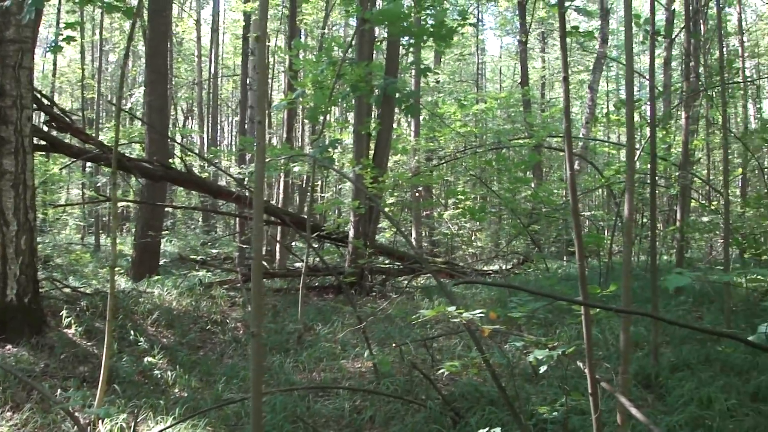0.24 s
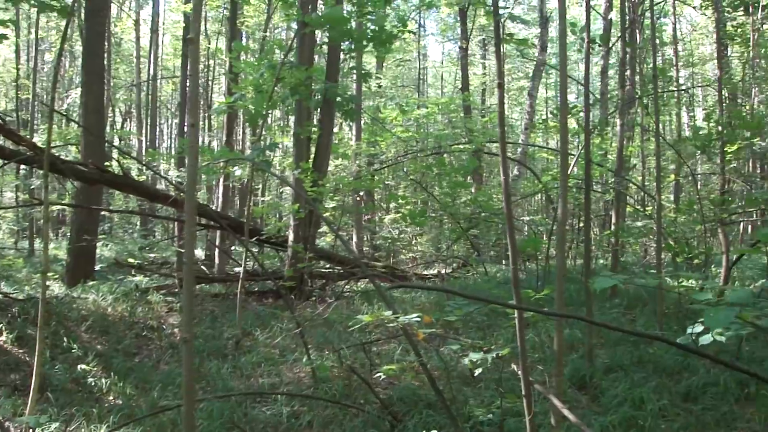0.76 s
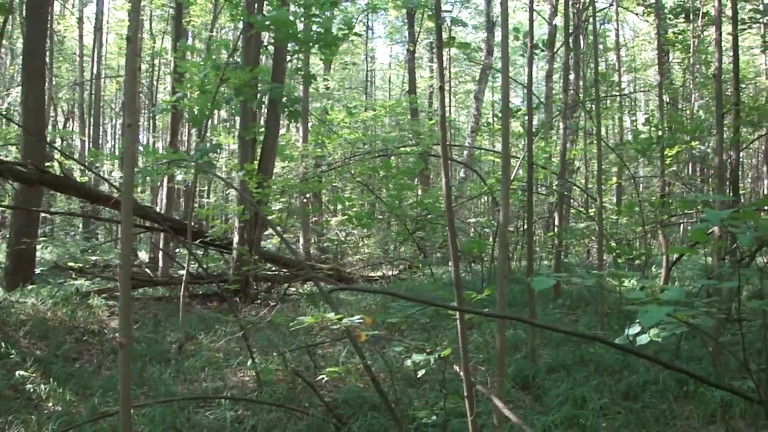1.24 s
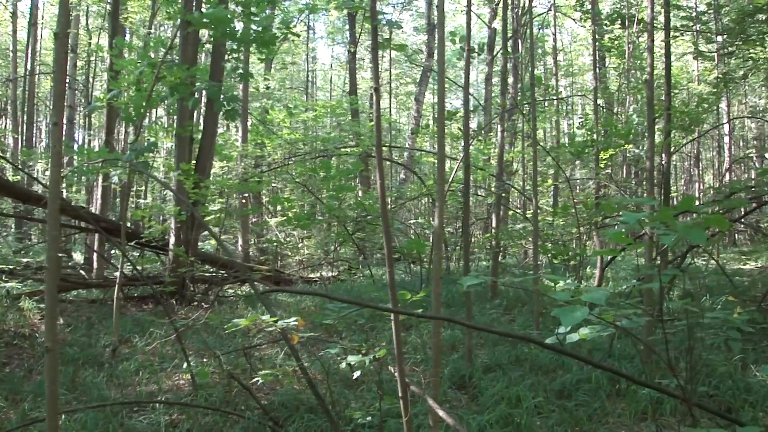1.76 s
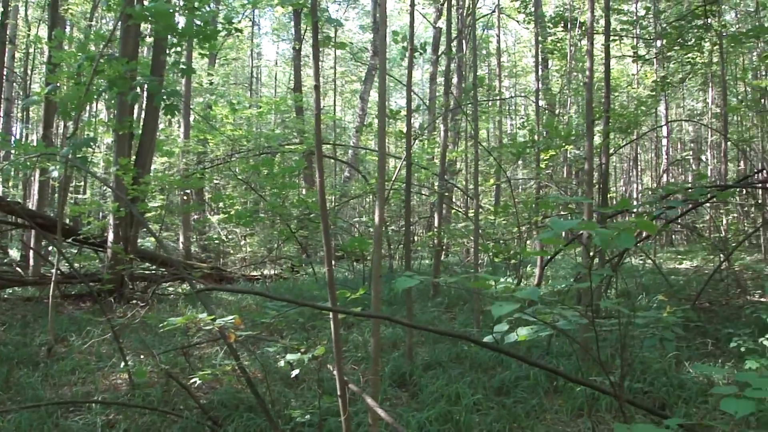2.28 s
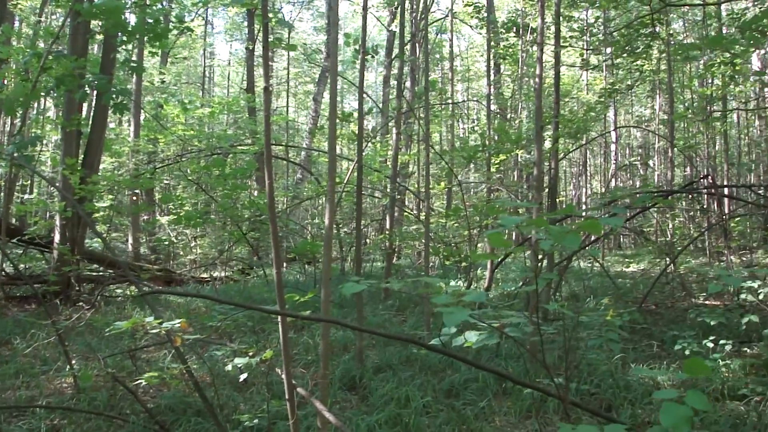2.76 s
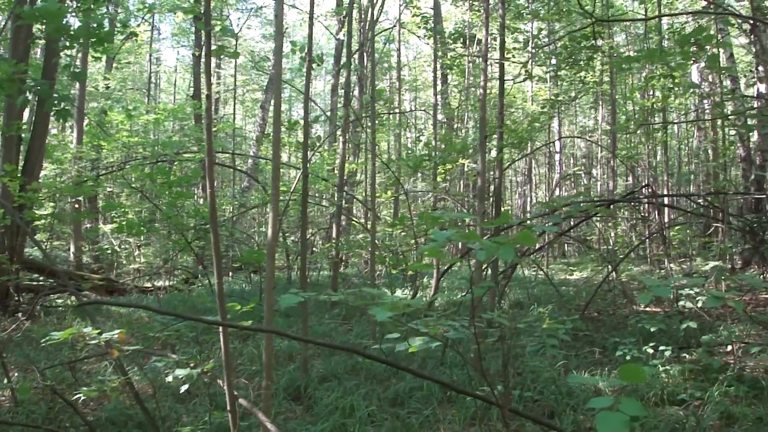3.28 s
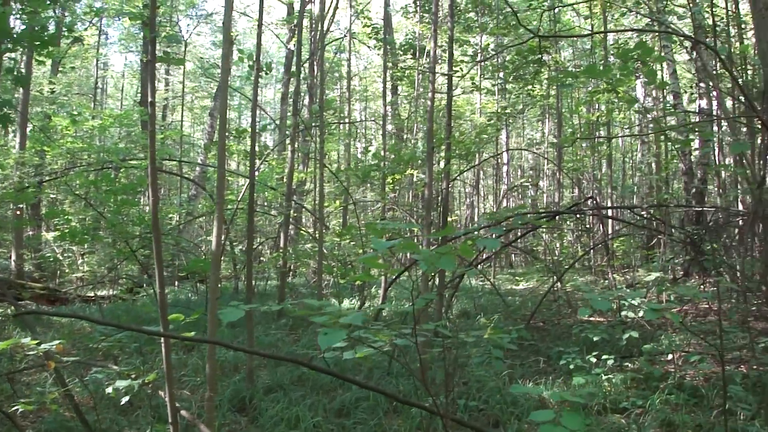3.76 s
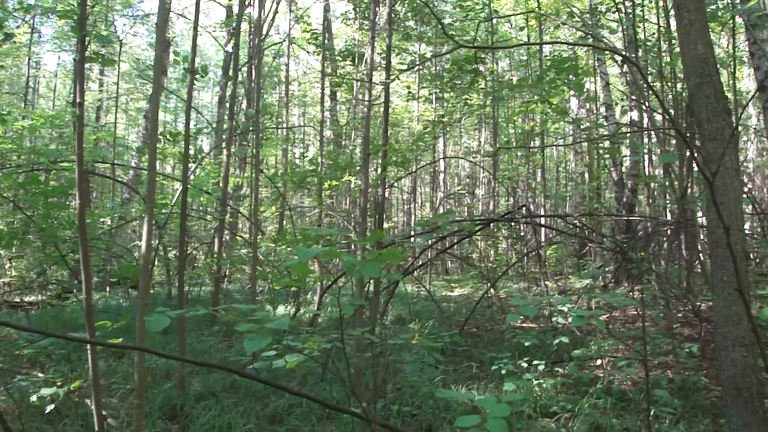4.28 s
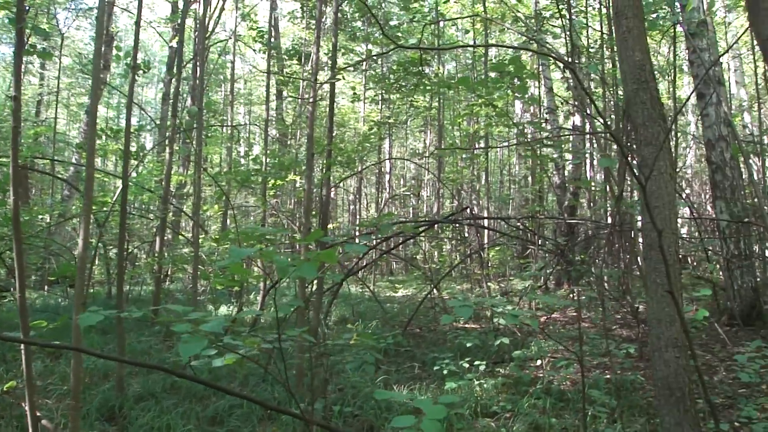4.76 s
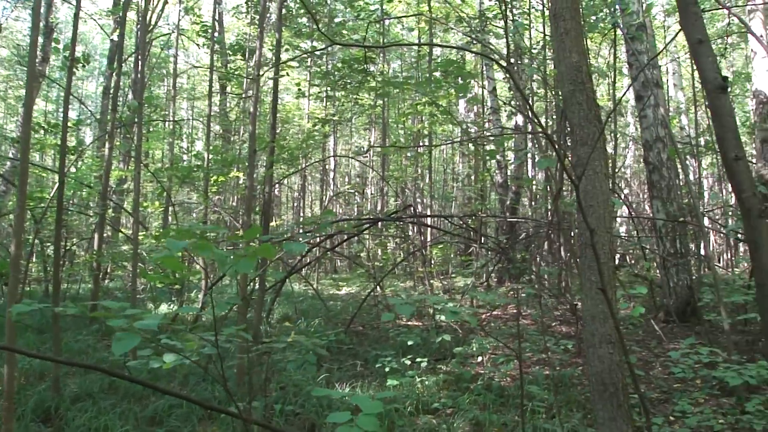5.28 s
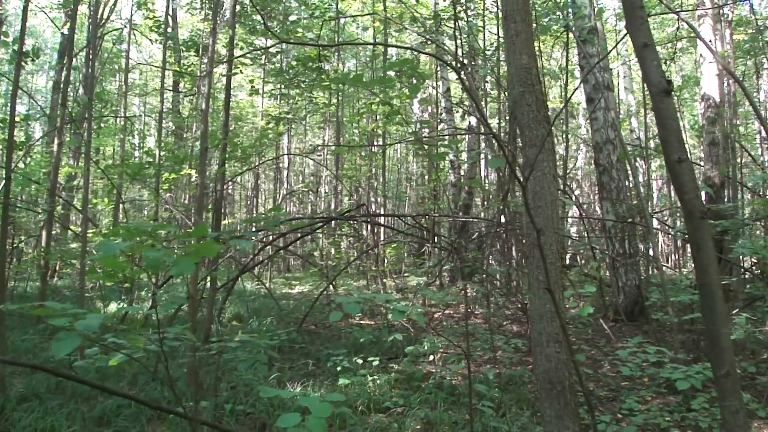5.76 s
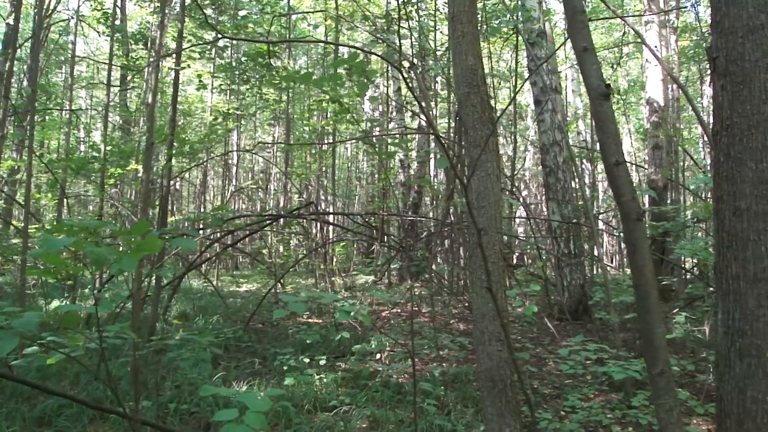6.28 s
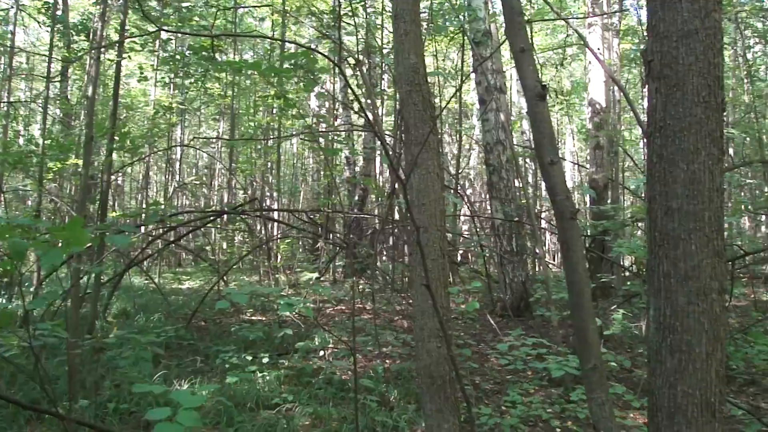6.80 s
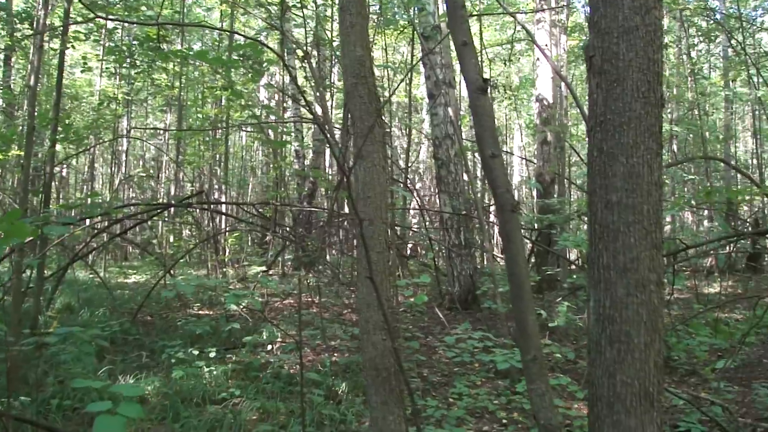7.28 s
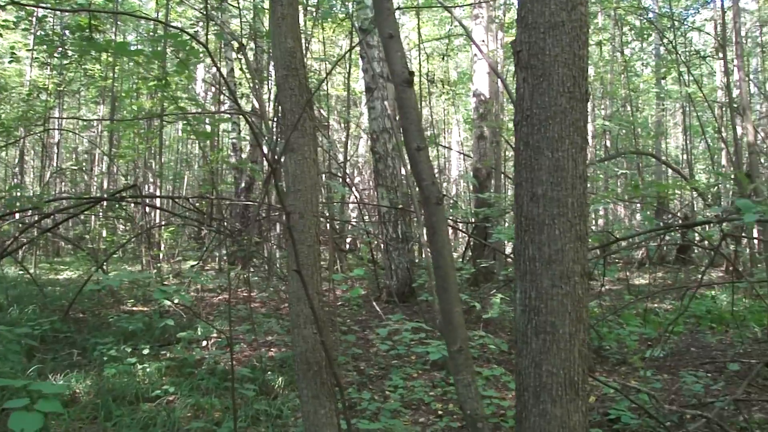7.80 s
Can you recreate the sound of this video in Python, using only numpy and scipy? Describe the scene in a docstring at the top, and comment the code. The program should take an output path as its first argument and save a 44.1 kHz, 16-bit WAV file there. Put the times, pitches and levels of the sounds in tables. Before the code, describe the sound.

Outdoors in a leafy summer forest, a breeze swells over the first few seconds and holds. Near leaves make a bright, even hiss, boughs add a softer swish, and distant treetops a faint low roar. The stereo hiss drifts further right as the microphone turns. Small wind bumps come early and midway; much louder, low, fluttering thumps crowd the last half second, harder on the right.

```python
"""A breeze rises in a summer forest: far crowns roar, boughs swish and leaves hiss overhead.
The foliage is coloured, patchy noise driven by one breeze curve. A camera turns slowly, so the treetop
hiss moves across its two microphone ports and leans further right. Eddies of air thump on the ports as
short swings of pressure in puffs of rumble, in opposite directions and harder on the right."""
import sys
import numpy as np
from scipy import signal
from scipy.fft import rfft, irfft, next_fast_len
from scipy.io import wavfile
from scipy.ndimage import uniform_filter1d, map_coordinates

SR = 44100
rng = np.random.default_rng(int(sys.argv[2]) if len(sys.argv) > 2 else 0)


def persist_wave(psi):
    """Save psi, clipped to +-1, as 16-bit WAV."""
    counts = np.round(np.clip(psi, -1, 1) * 32767).astype(np.int16)
    wavfile.write(sys.argv[1], SR, np.atleast_2d(counts).T)


N = 354519  # samples
TOP_HZ = 15460  # band limit of the camera
FRAME = 512  # samples in a spectral frame of the foliage
FULL_DB = -40  # leaf level that counts as full breeze

# the turn: each pair is a value at AHEAD_S and its change per second
AHEAD_S = 3
LEAD_US, LEAD_US_PER_S = -2.6, -3.5  # lead of the left port, before its growth with pitch
BALANCE_DB, BALANCE_DB_PER_S = -4.2, -0.6  # left minus right, before the soft limit and the share per pitch
BALANCE_MOST_DB = 7  # soft limit: the camera body shades a port by no more than this
TILT_DB, TILT_DB_PER_S = 1.06, -0.63  # hiss tilt per octave: duller as the ports turn away


def amp(db):
    """Decibels to a linear factor."""
    return 10 ** (np.asarray(db) / 20)


def unit(x):
    """x scaled to an RMS of one."""
    return x / np.sqrt(np.mean(np.abs(x) ** 2) + 1e-30)


def along(points, hz):
    """(Hz, value) points read on a log frequency axis."""
    f, v = np.transpose(points)
    return np.interp(np.log(hz + 1), np.log(f + 1), v)


def curves(rows, t):
    """The columns after the time, read at times t."""
    s, *cols = np.transpose(rows)
    return [np.interp(t, s, c) for c in cols]


def wobble(rate):
    """A smooth random curve, rate knots a second."""
    knots = rng.standard_normal(int(N * rate / SR) + 4)
    return map_coordinates(knots, [np.arange(N) * rate / SR])


def coloured(x, spectrum):
    """x filtered by (Hz, dB) points."""
    size = next_fast_len(N + 8192)
    gain = amp(along(spectrum, np.fft.rfftfreq(size, 1 / SR)))
    return irfft(rfft(x, size) * gain, size)[..., :N]


def turned(value, per_s, t):
    """A quantity that changes evenly as the camera turns."""
    return value + per_s * (t - AHEAD_S)


def port_wind():
    """Each eddy is a short falling swing of pressure in a puff of rumble; the ports move in opposition."""
    # Eddies hitting the ports. Each row: centre in seconds, level in dB before the low cut,
    # pitch at the centre in Hz, width at half height in seconds.
    eddies = [(.022, -39, 85, 0.011), (.052, -34, 155, 0.0096), (0.174, -42, 136, .007),
              (.512, -51, 85, 0.011), (.708, -51, 125, .01), (.932, -54, 85, .01), (4.277, -42, 143, .012),
              (4.3, -41, 124, .008), (4.382, -40, 105, .007), (4.594, -53, 105, .011),
              (5.958, -51, 80, .011), (6.11, -54, 70, .01), (6.155, -55, 80, 0.011), (6.233, -51, 75, .012),
              (6.282, -38, 100, .013), (6.336, -43, 92, 0.011), (6.39, -52, 80, .01),
              (6.798, -42, 100, .011), (6.843, -43, 91, .012), (6.875, -50, 85, .012),
              (6.926, -51, 80, .014), (7.289, -54, 80, 0.0092), (7.339, -45, 90, .011),
              (7.405, -44, 97, .011), (7.489, -33.5, 120, 0.0085), (7.62, -35, 105, .009),
              (7.649, -24.5, 155, 0.014), (7.69, -21, 190, 0.016), (7.715, -37, 114, .007),
              (7.779, -42, 95, .01), (7.8, -31, 140, .01), (7.828, -35, 122, .012),
              (7.871, -20.5, 140, 0.0095), (7.899, -36, 89, .012), (7.921, -25, 160, .008),
              (7.943, -27, 135, 0.0076), (8.035, -25, 171, 0.0054)]
    # Colour of the rumble. Each row: frequency in Hz, relative level in dB.
    rumble_colour = [(10, -60), (45, -8), (70, -2), (140, -6), (250, -10.5), (350, -18), (500, -70)]
    # The ports pass little of the slowest swings. Each row: frequency in Hz, gain in dB.
    low_cut = [(10, -30), (45, -11), (65, 1.5), (400, -2)]
    puff_db = -17  # rumble right around an eddy, against the eddy's level
    wake_db, wake_s = -28, 0.04  # fainter turbulence before and after it, and its fading time
    calm_db, calm_db_per_s = -83, 1  # the least draught, growing as the ports turn into the wind
    lumps_db = 5.5  # how lumpy the draught and the wakes are

    t = np.arange(-SR // 8, SR // 8) / SR
    push, puffs, wakes = np.zeros((3, N + 2 * len(t)))
    phases = rng.uniform(-1.3, 1, len(eddies))
    for (s, db, hz, width), phase in zip(eddies, phases):
        here = slice(round(s * SR), round(s * SR) + len(t))
        bell = np.exp(-4 * np.log(2) * (t / width) ** 2)
        # the swing slows as the eddy spreads out
        swing = bell * np.cos(2 * np.pi * hz * (t - 0.08 * t ** 2 / width) + phase)
        balanced_swing = swing - bell * swing.sum() / bell.sum()  # no net push
        push[here] += amp(db) * balanced_swing
        puffs[here] += amp(db + puff_db) * bell ** 0.36
        wakes[here] += amp(db + wake_db) * np.exp(-np.abs(t) / wake_s)
    # drop the lead-in so that each eddy is centred on its time
    push, puffs, wakes = (v[len(t) // 2:][:N] for v in (push, puffs, wakes))

    draught = amp(turned(calm_db, calm_db_per_s, np.arange(N) / SR) + 2.7 * wobble(2.05))
    flow = puffs + (wakes + draught) * amp(lumps_db * wobble(25))
    shared, own = unit(coloured(rng.standard_normal((2, N)), rumble_colour))
    right = coloured(push, low_cut) + flow * shared
    left = -amp(-7.5) * right + amp(-5.5) * flow * own
    return np.array([left, right])


def foliage(spectrum, patchy_db, tilts=False):
    """Countless leaves make patchy noise; the ports hear it with a lead and a level difference that turn."""
    # Likeness of the two ports. Each row: frequency in Hz, correlation from 0 to 1.
    alike = [(60, .1), (150, 0.3), (300, 0.49), (650, 0.69), (1400, 0.71), (3000, 0.76), (5000, 0.79),
             (8000, 0.75), (12000, 0.56)]
    # Shading by the camera body. Each row: frequency in Hz, share of the level difference as a factor.
    shadow = [(100, 0.3), (300, 0.95), (1300, .8), (2400, 1.2), (5000, 0.7), (8000, 0.11), (11000, .03)]

    hz, t, z = signal.stft(rng.standard_normal((2, N)), SR, nperseg=FRAME)
    hz = hz[:, None]
    # patches: random levels smoothed over neighbouring pitches, then over time
    field = uniform_filter1d(rng.standard_normal(z.shape[1:]), size=5, axis=0)
    field = uniform_filter1d(field, size=10, axis=1)
    tilt_db = tilts * turned(TILT_DB, TILT_DB_PER_S, t)
    octaves = np.log2(np.clip(hz, 3000, 13000) / 5500)
    z = z * amp(patchy_db * unit(field) + tilt_db * octaves)

    spread = np.arccos(np.clip(along(alike, hz), -1, 1)) / 2
    common, apart = np.cos(spread) * z[0], np.sin(spread) * z[1]
    balance_db = turned(BALANCE_DB, BALANCE_DB_PER_S, t)
    balance_db = BALANCE_MOST_DB * np.tanh(balance_db / BALANCE_MOST_DB)
    # the camera body bends short waves, so the lead grows with pitch
    lead_s = turned(LEAD_US, LEAD_US_PER_S, t) * (0.58 + hz / 25000) / 10 ** 6
    # half of the difference goes to each port
    half = amp(balance_db * along(shadow, hz) / 2) * np.exp(1j * np.pi * hz * lead_s)
    ports = np.array([(common + apart) * half, (common - apart) / half])
    pair = signal.istft(ports, SR, nperseg=FRAME)[1][:, :N]

    pair = coloured(pair, spectrum)
    # even out the level over one second, so that the caller sets it
    slow = np.sqrt(np.abs(uniform_filter1d(pair.mean(axis=0) ** 2, size=SR)))
    return pair / slow


def far_crowns(hiss_db):
    """Distant treetops blend into a low roar that grows less than the near leaves do."""
    # Colour of the roar. Each row: frequency in Hz, relative level in dB.
    roar_colour = [(18, -70), (30, -40), (38, -36), (133, -11), (156, -7), (189, -2.5), (291, -3),
                   (450, -3), (626, -2), (798, -3), (966, -3), (1270, -6.5), (1900, -9.5), (2470, -18),
                   (4180, -120)]
    full_breeze_db, grows = -54.5, 0.33  # grows: dB gained per dB of breeze
    level_db = full_breeze_db + grows * (hiss_db - FULL_DB) + 0.45 * wobble(1.6)
    return amp(level_db) * foliage(roar_colour, patchy_db=1.0)


def boughs(hiss_db, gust, t):
    """Leafy boughs swish dB for dB with the breeze, and grow as they come round into the ports' view."""
    # Colour of the swish. Each row: frequency in Hz, relative level in dB.
    swish_colour = [(1300, -36), (1600, -15.5), (2000, -7), (2430, -3), (3040, -2.5), (3500, -0.5),
                    (3800, -5.5), (4100, -2.5), (4600, -62)]
    ahead_db, db_per_s = -50.5, 0.46  # at full breeze: level at AHEAD_S, change per second
    level_db = turned(ahead_db, db_per_s, t) + (hiss_db - FULL_DB)
    return amp(level_db + 0.4 * gust + 0.3 * wobble(4.1)) * foliage(swish_colour, patchy_db=1.57)


def leaves_and_top_band(hiss_db, gust):
    """Near leaves hiss in a broad treble band; a faint, patchy, very high band is added above it."""
    # Colour of the hiss. Each row: frequency in Hz, relative level in dB.
    hiss_colour = [(3200, -60), (3700, -8.5), (4000, -5), (4400, -1), (4930, 0), (6000, -1.5), (7780, -4),
                   (10500, -9.5), (11400, -13.5), (12000, -19.5), (12600, -29), (13000, -48), (13300, -80)]
    # Colour of the very high band. Each row: frequency in Hz, relative level in dB.
    top_colour = [(13400, -60), (13900, -6), (14500, 3), (15100, -6), (15400, -26)]
    level = amp(hiss_db + 0.29 * gust + 0.12 * wobble(13))
    hiss = foliage(hiss_colour, patchy_db=0.77, tilts=True)
    top_band = amp(-40) * foliage(top_colour, patchy_db=4.5)  # the same kind of patchy noise
    return level * (hiss + top_band)


def forest():
    """One breeze drives far crowns, boughs and leaves; each also swells a little by itself."""
    # The breeze. Each row: time in seconds, level of the leaf hiss in dB before its small swells.
    breeze = [(0, -45.5), (.8, -43), (1.7, -42), (2.45, -41.5), (2.6, -40), (3.2, -40), (3.6, -39.5),
              (4.3, -40), (4.8, -39.5), (6, -39.5), (6.9, -40.4), (8.04, -40.5)]
    t = np.arange(N) / SR
    hiss_db, = curves(breeze, t)
    gust = wobble(7)  # swells shared by boughs and leaves
    return far_crowns(hiss_db) + boughs(hiss_db, gust, t) + leaves_and_top_band(hiss_db, gust)


def scene():
    """The wind on the ports and the forest."""
    return port_wind() + forest()


def record(dry):
    """The camera keeps nothing above its band limit."""
    size = next_fast_len(N + 8192)
    kept = np.fft.rfftfreq(size, 1 / SR) < TOP_HZ
    return irfft(rfft(dry, size) * kept, size)[:, :N]


dry = scene()
out = record(dry)
persist_wave(out)
```